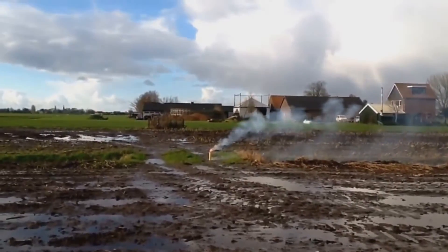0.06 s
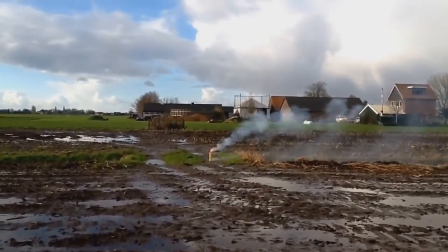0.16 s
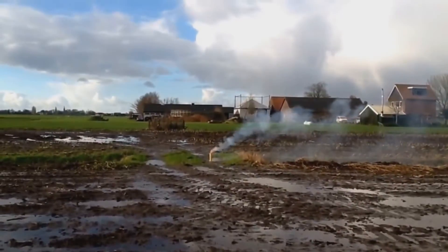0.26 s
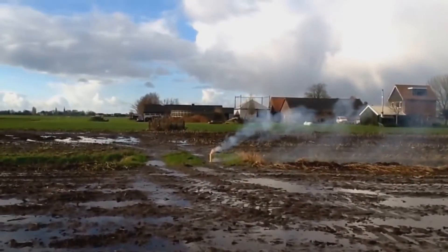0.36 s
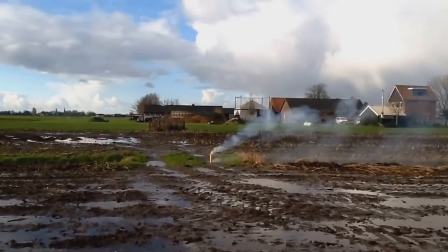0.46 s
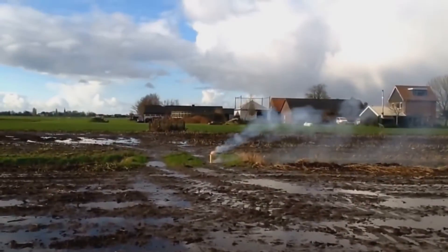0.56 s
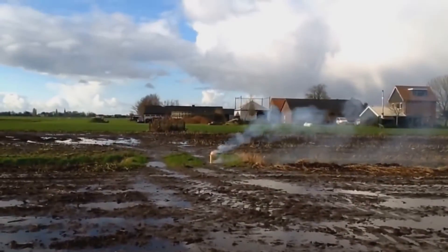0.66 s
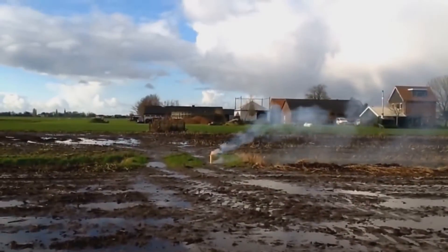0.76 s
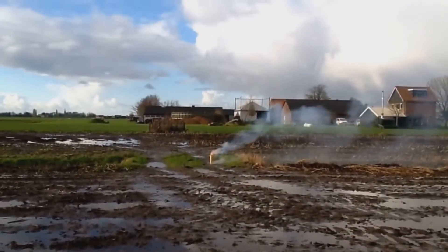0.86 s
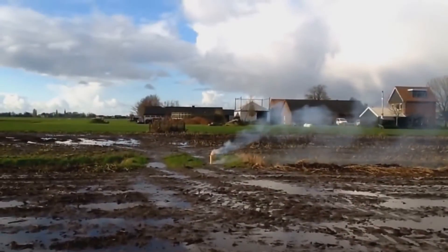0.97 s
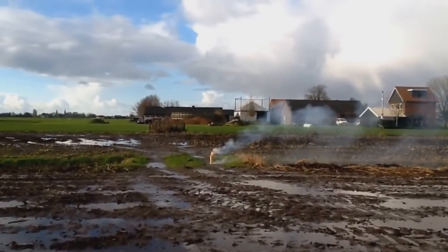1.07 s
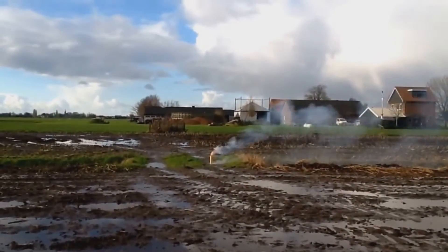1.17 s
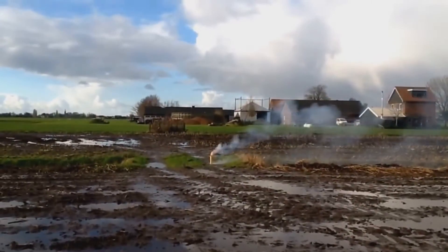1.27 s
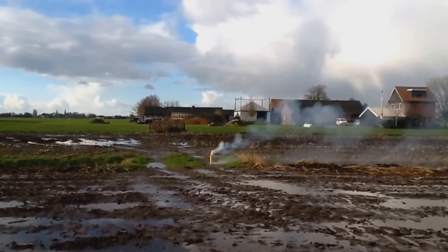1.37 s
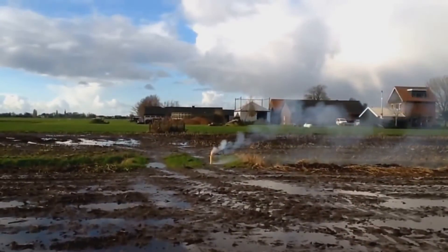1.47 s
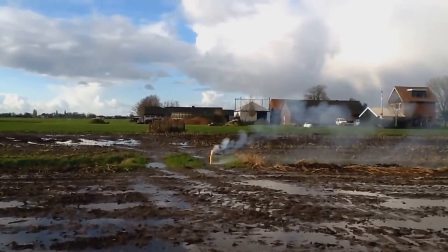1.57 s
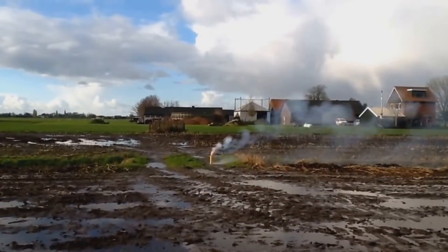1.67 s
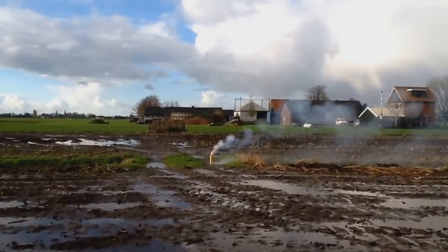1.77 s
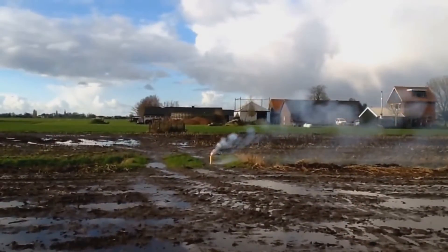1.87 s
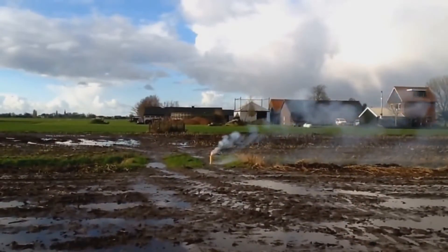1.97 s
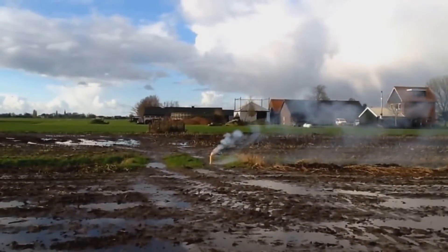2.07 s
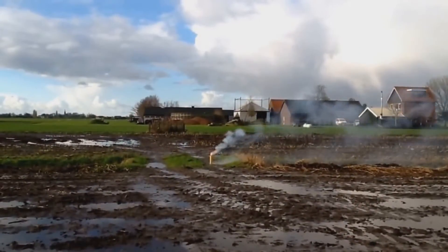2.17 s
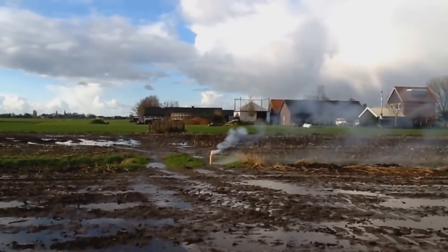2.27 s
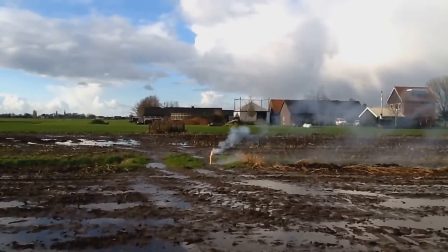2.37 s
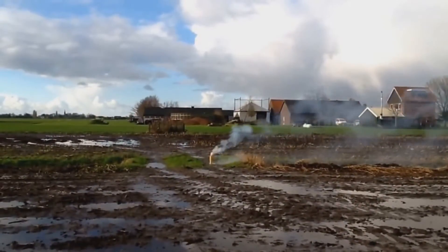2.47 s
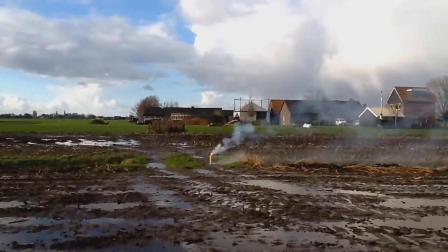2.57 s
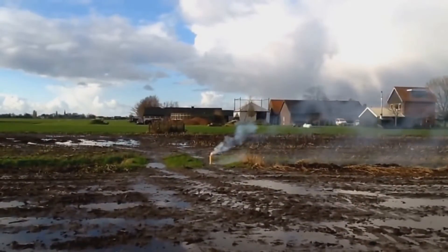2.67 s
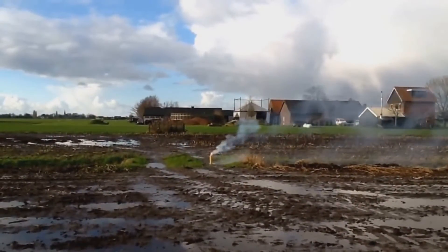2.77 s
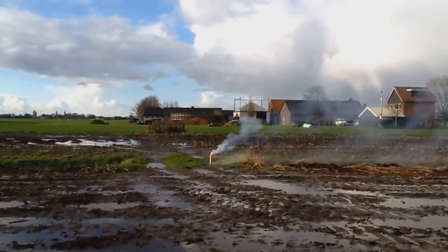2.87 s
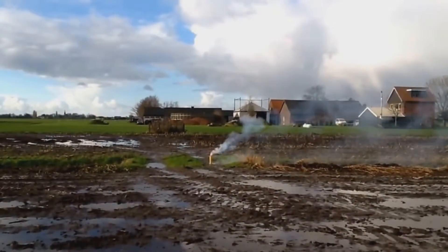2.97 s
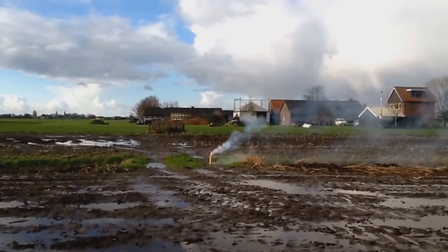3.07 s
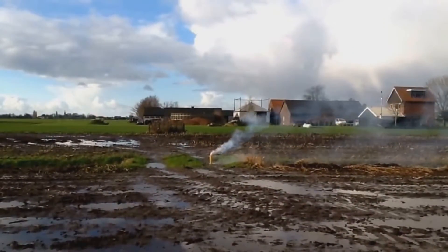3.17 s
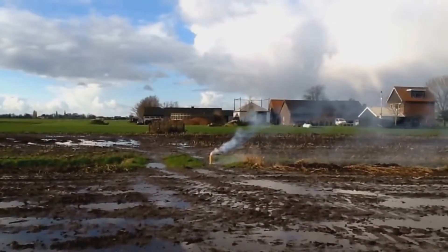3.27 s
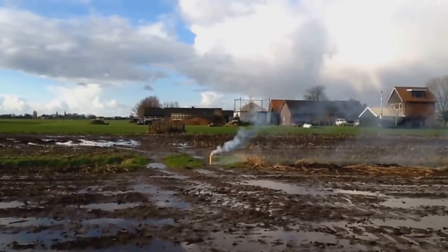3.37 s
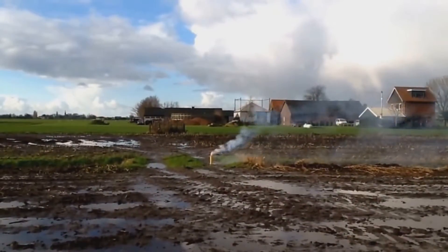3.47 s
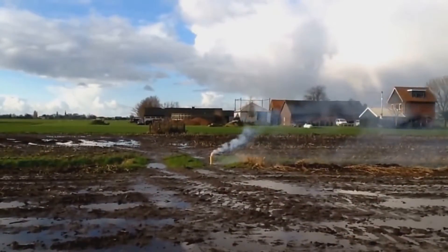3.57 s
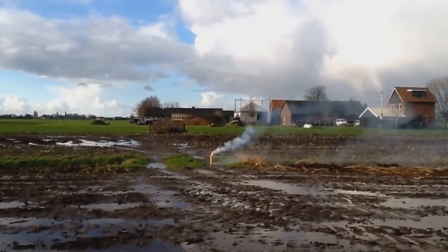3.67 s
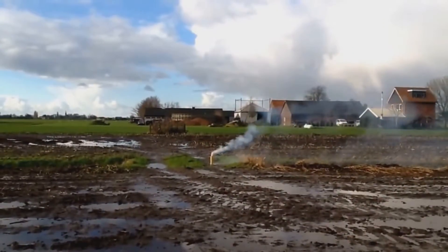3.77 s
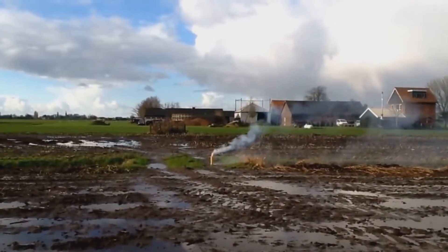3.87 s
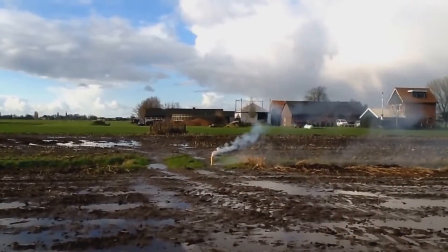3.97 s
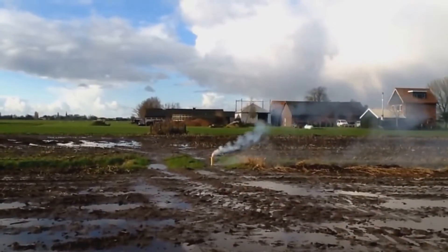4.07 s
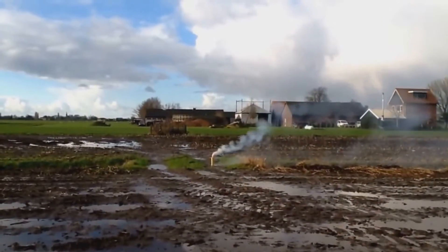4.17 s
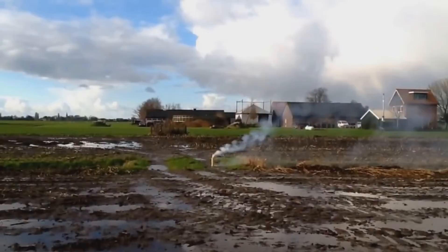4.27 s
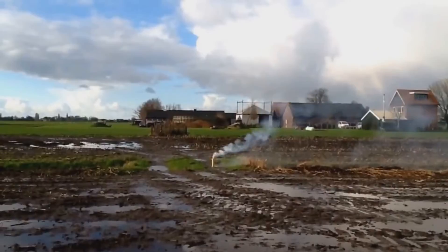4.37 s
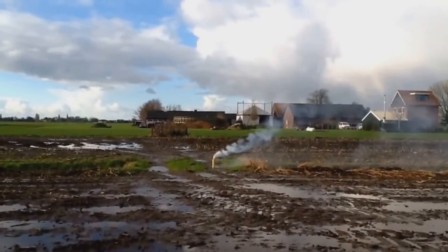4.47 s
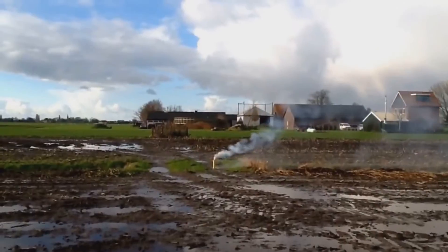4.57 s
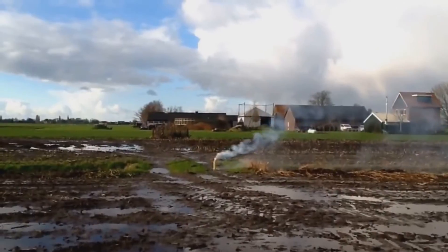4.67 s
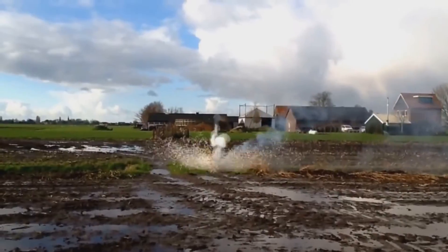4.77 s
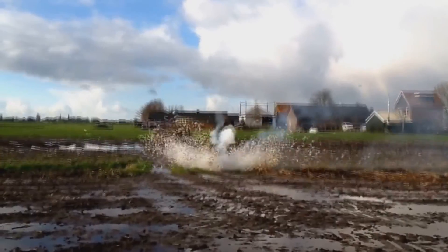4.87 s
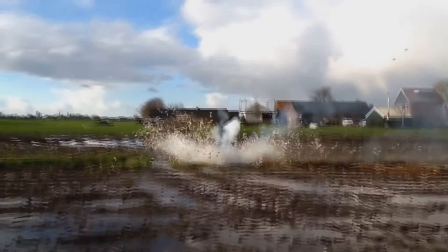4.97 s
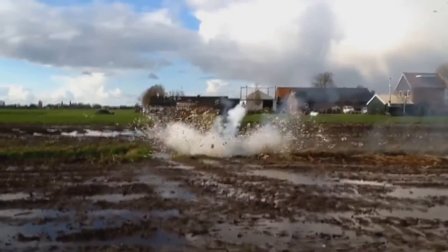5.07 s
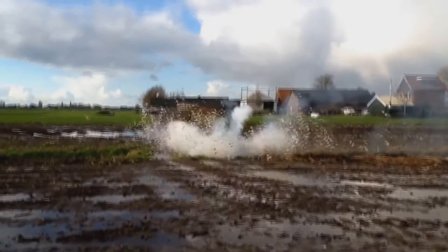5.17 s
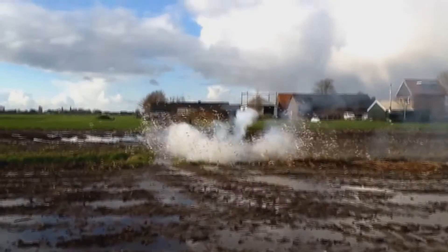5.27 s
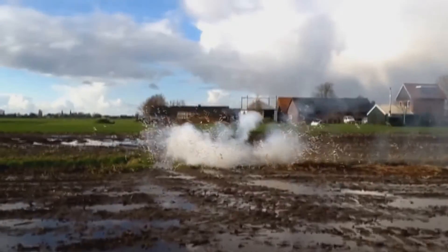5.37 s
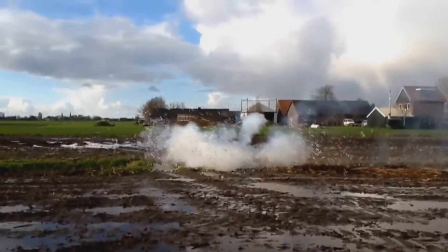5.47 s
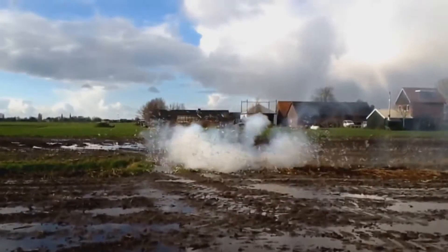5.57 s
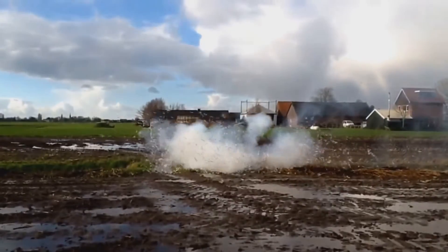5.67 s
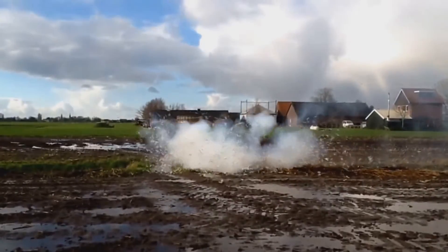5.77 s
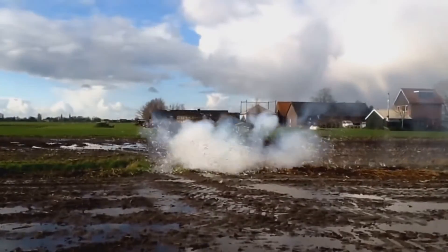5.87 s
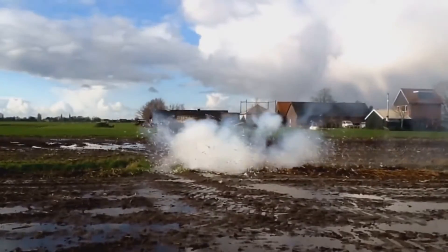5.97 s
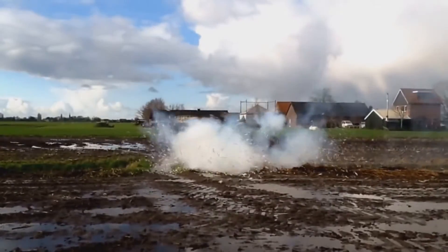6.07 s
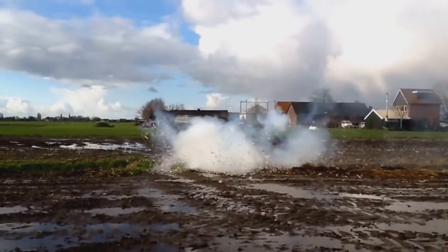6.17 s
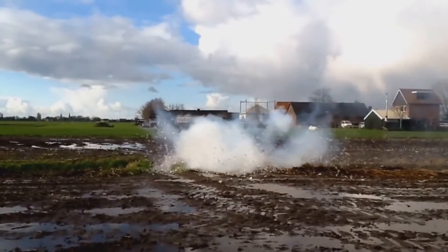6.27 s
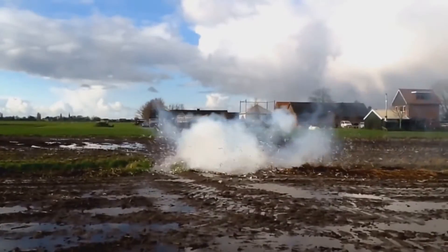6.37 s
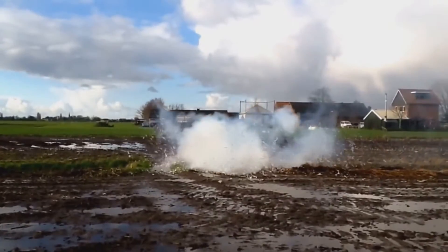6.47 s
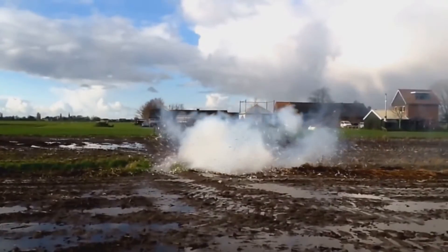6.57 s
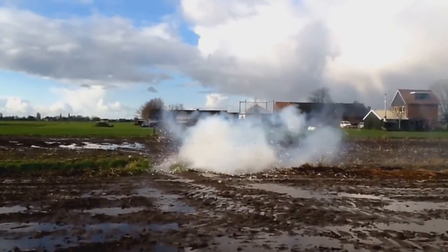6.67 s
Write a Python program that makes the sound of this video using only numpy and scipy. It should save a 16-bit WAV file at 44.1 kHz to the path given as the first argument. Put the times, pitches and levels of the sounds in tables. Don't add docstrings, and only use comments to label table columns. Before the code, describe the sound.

Sparse, sharp fuse pops with tiny ticks and fizz, each with a short ground-scattered tail, over quiet distant traffic and wind. After nearly five seconds a single violent explosion cracks and thuds, clipping the microphone. Strong echoes come back about half a second later from buildings across the open field, then the rumble decays and light mud drops patter faintly.

```python
import sys
import numpy as np
from scipy import signal
from scipy.io import wavfile

SR = 44100
rng = np.random.default_rng(int(sys.argv[2]) if len(sys.argv) > 2 else 0)


def to_wav(sig):
    pcm = np.clip(np.atleast_2d(sig), -1, 1) * 32767
    pcm = np.round(pcm).astype(np.int16)
    wavfile.write(sys.argv[1], SR, pcm.T)


def linear_from_db(decibels):
    return 10 ** (np.asarray(decibels, float) / 20)


N = 296793
TIME = np.arange(N) / SR

# f/Hz, density/dB per Hz
COUNTRY_COLOUR = [(25, -27.5), (50, -23), (130, -1.5), (200, 3), (310, -3.5), (440, -10), (560, -4),
                  (720, -6.5), (890, -13), (1700, -15), (2600, -23), (4000, -26), (10000, -26),
                  (15500, -32.5)]
# t/s, peak level/dB, centre f/Hz, puff level/dB re the peak
FUSE_BURSTS = [(0.3564, -15, 2580, -6), (0.6199, -13, 4840, -8.5), (0.6412, -14, 4120, -19.5),
               (0.937, -14.5, 7400, -8), (1.1051, -13.5, 5900, -4.5), (1.1186, -18, 6050, -25),
               (1.1797, -12.5, 5700, -3), (1.8492, -10.5, 6940, -17), (2.0098, -13.5, 7700, -14),
               (2.0647, -11.5, 7540, -11), (2.149, -15, 8600, -41), (2.2557, -7.5, 5740, -14.5),
               (2.444, -3.5, 4520, -8.5), (2.4566, -13, 5900, -25), (2.4883, -15, 7200, -19),
               (2.6444, -9.5, 6800, -16), (2.9319, -10, 4400, -9), (3.097, -12.5, 5250, -10),
               (3.142, -15, 4300, -4), (3.2504, 2, 5650, -9), (3.3661, -7.5, 6400, -10),
               (3.372, -13.5, 6170, -18), (3.5, -6.5, 4300, -7.5), (3.5604, -10.5, 4130, -7),
               (3.6595, -17, 5200, -10), (3.9915, -7, 5900, -14.5), (4.3334, -13, 6600, -17),
               (4.3551, -20, 3440, -9), (4.7022, -8, 3900, -4), (4.8733, -17, 6750, -10)]
# t/s, peak level/dB, centre f/Hz
FUSE_SPITS = [(0.3792, -16.5, 5900), (0.6877, -22, 6140), (0.8295, -21, 4300), (1.236, -22.5, 7900),
              (1.2921, -20, 6900), (1.3656, -20.5, 6500), (1.4876, -25, 6900), (1.501, -16.5, 5700),
              (1.5893, -24, 7040), (1.6779, -23.5, 6700), (1.9923, -26, 7240), (2.2486, -23.5, 6800),
              (2.3295, -19.5, 6170), (1.9363, -36, 2040), (3.0378, -24, 7200), (3.0638, -27, 6600),
              (3.3319, -21, 5500), (3.515, -28, 6600), (3.7791, -19.5, 4170), (3.8168, -16.5, 7860),
              (3.8548, -23, 4680), (3.9434, -21, 5170), (4.0341, -22, 8500), (4.3027, -24, 4500),
              (4.31, -25, 5500), (4.412, -25.5, 5070), (4.4446, -25.5, 1540), (4.4565, -18, 6400),
              (4.4777, -25.5, 4500), (4.8199, -20.5, 4140)]
# t/s, peak level/dB
FUSE_TICKS = [(0.0423, -25.5), (0.1816, -31.5), (0.3734, -21), (0.4235, -26.5), (0.5, -33), (0.5636, -31.5),
              (0.698, -23), (1.0723, -23.5), (1.1558, -24.5), (1.6747, -20), (1.8306, -30), (1.8814, -21),
              (2.351, -25.5), (2.5355, -24), (2.6952, -26), (3.0678, -20), (3.4893, -33), (3.6436, -31),
              (3.7299, -29.5), (3.8257, -35), (4.305, -22), (4.362, -28.5), (4.466, -35), (3.1499, -28),
              (4.1512, -35), (3.4694, -34), (0.9981, -36), (4.501, -28.5), (4.5722, -27.5), (4.5992, -21.5)]
# t/s, peak level/dB, centre f/Hz
MUD_LANDINGS = [
    (5.8689, -48.5, 2500),
    (6.0115, -44.5, 2210),
    (6.0538, -42.5, 6260),
    (6.0615, -29, 7900),
    (6.135, -39, 8260),
    (6.196, -39.5, 6100),
    (6.2426, -43.5, 5300),
    (6.3866, -40.5, 7340),
    (6.4736, -48, 6560),
]
# f/Hz, level/dB
GROUND_COLOUR = [(300, -4), (1200, -1), (3000, -3), (6000, -2), (9000, -1), (12000, -8.5), (15500, -3)]
# f/Hz, density/dB per Hz
ROAR_SPECTRUM = [(60, -22.5), (130, 0.5), (300, -1), (480, -7), (800, -5.5), (1400, -11), (2250, -11),
                 (4750, -16.5), (10500, -21), (14600, -32), (16000, -47)]
# arrival t/s, level at 1 kHz/dB, T60 at 1 kHz/s, tilt/dB per octave
SCATTERER_GROUPS = [(4.905, 3.5, 0.37, 1), (4.951, -9.5, 1.32, -1), (5.372, -26.5, 1.4, 1.5),
                    (5.404, -11, 0.32, 0.5), (5.484, -14.5, 0.44, 0.5), (5.545, -14, 0.42, -0.5),
                    (5.46, -24, 1.25, -5.5), (5.62, -23, 0.55, 2.7), (5.72, -30.5, 1, 1.1),
                    (5.7, -46.5, 2, -5.5), (5.95, -54, 9.9, -1)]
# t/s, length/s, level/dB
SHOCK_FRONT = (4.9063, .0012, -3.0)
# t/s, f/Hz, level/dB
PRESSURE_SWINGS = [(4.8963, 323, -25), (4.908, 150, -14), (5.1138, 940, -12), (5.1154, 680, -1),
                   (5.117, 183, -10), (5.232, 146, -13), (5.3188, 530, -5), (5.3722, 535, -8),
                   (5.375, 575, 1), (5.4352, 370, -2), (5.4368, 990, 3.5), (5.4398, 158, 4.5),
                   (5.509, 390, -2.5), (5.5141, 170, -6), (5.546, 250, -18), (5.583, 250, -3.5),
                   (5.643, 890, -12), (5.645, 171, -2.5), (5.855, 195, -29), (6.055, 206, -26.5),
                   (6.296, 124, -35.5)]
# t/s, peak level/dB, centre f/Hz
WALL_CRACKS = [(4.8955, -28, 1210), (5.1143, -14.5, 6130), (5.115, -10.5, 4900), (5.116, -10.5, 2050),
               (5.318, -24, 3630), (5.3737, -30, 2558), (5.374, -25.5, 3970), (5.438, -11, 1970),
               (5.4405, -12, 1600), (5.492, -28, 4000), (5.509, -20.5, 2940), (5.5135, -20, 2030),
               (5.546, -33, 1180), (5.554, -28, 1200), (5.583, -18, 960), (5.608, -22, 2540),
               (5.698, -35, 3500), (5.643, -14.5, 2250)]

SHOCK_S = SHOCK_FRONT[0]
FARM_ECHO_S = 5.4
MIC_LOW_HZ = 122


def filtered(x, order, hz, kind="low"):
    return signal.sosfilt(signal.butter(order, hz, kind, fs=SR, output="sos"), x)


def rms_one(x):
    return x / np.sqrt(np.mean(x ** 2) + 1e-20)


def at_hz(points, hz):
    table = np.array(points)
    return np.interp(np.log(hz), np.log(table[:, 0]), table[:, 1])


def drift(rate_hz):
    pole = np.exp(-2 * np.pi * rate_hz * 40 / SR)
    noise = rng.standard_normal(N // 40 + 2002)
    slow = signal.lfilter([1], [1, -2 * pole, pole * pole], noise)[2000:]
    return np.interp(np.arange(N) / 40, np.arange(len(slow)), rms_one(slow))


def bands():
    edges = 25 * 2 ** np.arange(0, 9.5, 1 / 3)
    white = rng.standard_normal((2, N))
    for k, (low, high) in enumerate(zip(edges, edges[1:])):
        yield np.sqrt(low * high), filtered(white[k % 2], 2, [low, high], "band")


def add(out, s, sound):
    i = round(s * SR)
    out[i:i + len(sound)] += sound[:N - i]


def country(patchy_db=2.17, level_db=-52.5, duck_db=6.5, recover_s=1.6):
    air = sum(linear_from_db(at_hz(COUNTRY_COLOUR, hz) + patchy_db * drift(6)) * noise for hz, noise in bands())
    since = np.maximum(TIME - SHOCK_S, 0)
    duck = duck_db * (since > 0) * np.exp(-(since / recover_s) ** 2)
    return linear_from_db(level_db - duck) * rms_one(air)


def snap(hz, chance, width=3.9, after_db=-13, after_s=0.00041):
    t = np.arange(len(chance)) / SR
    sparks = linear_from_db(after_db) * chance * np.exp(-t / after_s)
    sparks[:2] = [-1, 0]
    edges = np.clip([hz / (1 + width), hz * (1 + width)], 200, 18000)
    shaped = filtered(sparks, 2, edges, "band")
    return shaped / np.max(np.abs(shaped))


def grains(tick_hz=6700, tick_spread=0.12, fizz_count=40, fizz_db=-37.5, fizz_spread_db=-3.5):
    where = rng.random((fizz_count, 2))
    fizz = [(s * SHOCK_S, fizz_db + fizz_spread_db * (2 * size - 1)) for s, size in where]
    faint = FUSE_TICKS + fizz
    pitch = tick_hz * np.exp(tick_spread * rng.standard_normal(len(faint)))
    small = FUSE_SPITS + MUD_LANDINGS + [(s, db, hz) for (s, db), hz in zip(faint, pitch)]
    return FUSE_BURSTS + [(s, db, hz, min(-4 - 10.5 * np.log2(hz / 4500), 0)) for s, db, hz in small]


def ground_answer(t60_s=0.15, near_t60_s=0.022):
    t, tail = TIME[:8000], 0
    for hz, noise in bands():
        fall_db = 60 * t / t60_s * (hz / 4000) ** 0.45
        tail = tail + linear_from_db(at_hz(GROUND_COLOUR, hz) - fall_db) * noise[9000:17000]
    return linear_from_db(-8.5) * tail * (1 + linear_from_db(13.0 - 60 * t / near_t60_s))


def fuse(lead_db=-28, lead_s=0.0013, body_hz=900, splutter_db=-19.0, top_hz=10600):
    out, bounced, events = np.zeros(N), np.zeros(N), grains()
    chance = rng.standard_normal((len(events), 2, 200))
    for (s, peak_db, hz, body_db), (burst, lead) in zip(events, chance):
        width = 1.087 * min(hz / 3500, 1) ** 2
        sharp = snap(hz, burst, width=width, after_db=splutter_db + 1.1 * lead[2], after_s=0.0011)
        puff = np.roll(snap(body_hz, burst, width=1.6, after_db=splutter_db), 3)
        pop = linear_from_db(peak_db - 0.5) * (sharp - linear_from_db(body_db - 7.5) * puff)
        add(out, s - .00005, pop)
        tick = linear_from_db(peak_db + lead_db + 3.3 * lead[1]) * snap(hz, lead, after_db=11)
        add(out, max(s - lead_s * (1 + np.abs(lead[0])), 0), tick)
        add(bounced, s + 0.00055, linear_from_db(-34.5 + 0.086 * (peak_db + 16.5)) * pop)
    out += signal.fftconvolve(bounced, ground_answer())[:N]
    return filtered(out, 2, top_hz)


def returns(hz, t, rise_s=0.011, rise_per_s=0.0067, treble_damping=0.26):
    power = 0
    for s, level_db, t60, tilt_db in SCATTERER_GROUPS:
        age = np.maximum(t - s, 0)
        fall_db = 60 * age / t60 * (hz / 1000) ** treble_damping
        swell = 1 - np.exp(-age / (rise_s + rise_per_s * (s - SHOCK_S)))
        level = linear_from_db(level_db + tilt_db * np.log2(hz / 1000) - fall_db)
        power = power + (swell * level) ** 2
    return np.sqrt(power)


def roar(level_db=-8, lumpy_db=1.0, slap_db=2.0, air_db=30, onset_s=4.9122, lull_db=-19):
    first = round(SHOCK_S * SR)
    t = TIME[first:]
    coarse_t = t[::32]
    clumps, slaps = drift(35), 0.68 * drift(30)
    out, reference = np.zeros(N), 0
    for hz, noise in bands():
        if hz < 60:
            continue
        extra_db = -air_db * np.clip(TIME - onset_s, 0, 1) * (hz / 10000) ** 2
        extra_db += slap_db * (drift(30) + slaps) * (TIME > FARM_ECHO_S) * min(hz / 1000, 1)
        extra_db += lumpy_db * (clumps + drift(44))
        colour_db = at_hz(ROAR_SPECTRUM, hz)
        reference = reference + linear_from_db(colour_db) * noise
        envelope = np.interp(t, coarse_t, returns(hz, coarse_t))
        out[first:] += envelope * linear_from_db(colour_db + extra_db[first:]) * noise[first:]
    gate = np.where(TIME > onset_s, 1, linear_from_db(lull_db))
    return linear_from_db(level_db) * gate * out / np.std(reference)


def shock_front():
    s, length_s, level_db = SHOCK_FRONT
    front = np.tanh(0.87 * rng.standard_normal(80)) * (np.arange(80) < length_s * SR)
    out = np.zeros(N)
    add(out, s, linear_from_db(level_db + 2.0) * filtered(front, 2, 9500))
    return out


def pressure_swings(t60_s=0.026, damping=1.43):
    out, t = np.zeros(N), np.arange(4000) / SR
    for s, hz, level_db in PRESSURE_SWINGS:
        t60 = t60_s * (200 / hz) ** damping
        swell = 1 - np.exp(-t * hz * 4.04)
        add(out, s, -linear_from_db(level_db + 3.0 - 60 * t / t60) * swell * np.sin(2 * np.pi * hz * t))
    return out


def wall_cracks():
    out = np.zeros(N)
    chance = rng.standard_normal((len(WALL_CRACKS), 400))
    for (s, level_db, hz), burst in zip(WALL_CRACKS, chance):
        crack = snap(hz, burst, width=0.55, after_db=-5.5, after_s=0.0014)
        top_hz = min(15000 / (1 + 0.8 * max(s - SHOCK_S, 0)), 2.7 * hz)
        add(out, s, linear_from_db(level_db) * filtered(crack, 4, top_hz))
    return out


def blast():
    return filtered(shock_front() + pressure_swings() + wall_cracks(), 4, 92, "high")


def scene():
    scattered = filtered(fuse() + roar(), 4, MIC_LOW_HZ, "high")
    return (country() + scattered + blast())[None]


def band_limit(x):
    return signal.sosfilt(signal.butter(12, 16630, fs=SR, output="sos"), x)


def record(dry, overload=1.7, cutoff_hz=16400):
    x = overload * np.tanh(dry / overload)
    top_cut = signal.cheby2(8, 30, cutoff_hz, fs=SR, output="sos")
    for stage in range(2):
        x = signal.sosfilt(top_cut, np.clip(x, -.94, .97))
    return band_limit(x)


dry = scene()
out = record(dry)
to_wav(out)
```